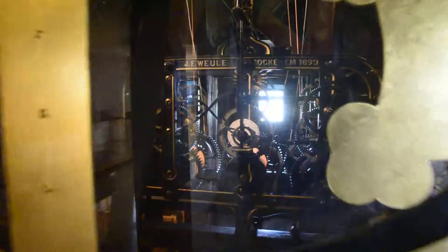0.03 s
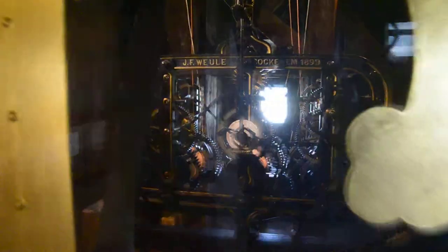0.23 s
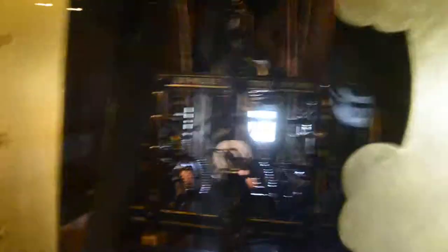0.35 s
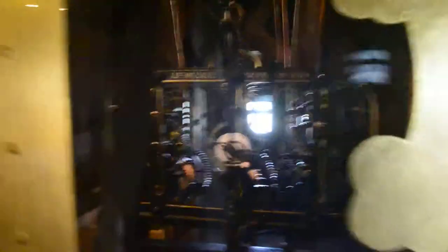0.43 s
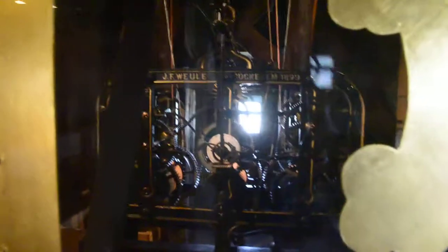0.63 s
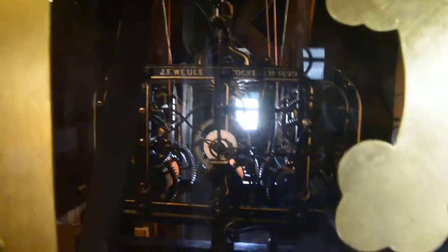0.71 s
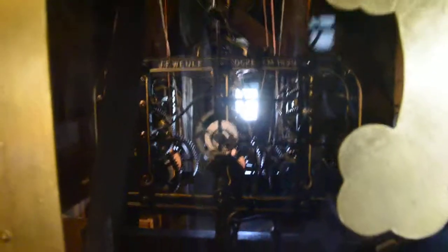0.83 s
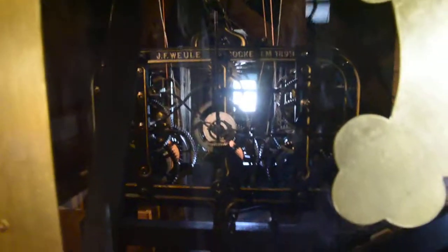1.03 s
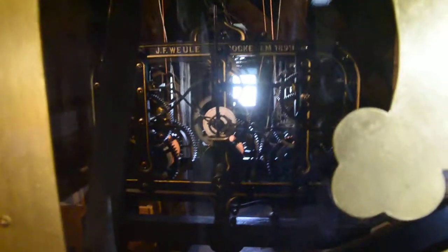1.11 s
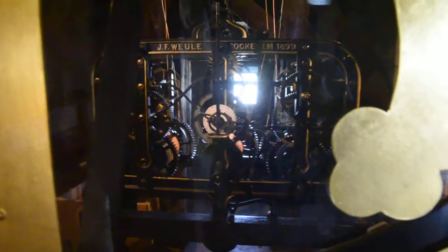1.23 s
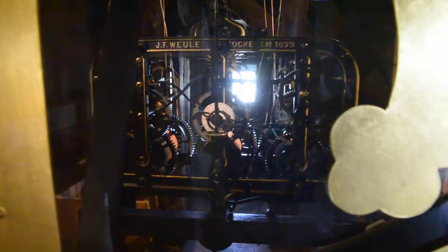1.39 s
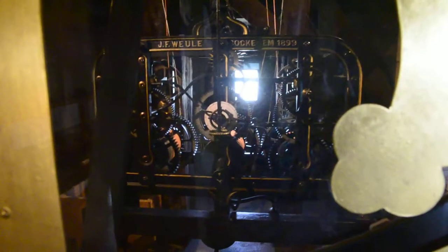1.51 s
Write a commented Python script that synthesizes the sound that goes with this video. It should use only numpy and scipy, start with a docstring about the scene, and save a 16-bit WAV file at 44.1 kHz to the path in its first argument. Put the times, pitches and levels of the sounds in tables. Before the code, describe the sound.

Two quick metallic clacks come from the works of an old clock, the first one louder. They boom and die away slowly in a big, echoing room as small parts tick lightly and irregularly.

```python
"""A tower clock in a dark chamber

The clock's works clack twice: a dull knock, a sharp metal snap a millisecond later, and a rough crack.
The large chamber answers with a long, booming tail of echoes. Small ticks of the works follow,
over a thin whine, a soft rush of air and a faint rustle that swells twice.
Ringing metal is made of fading sine waves; the echoes are fading noise and a few low tones."""
import sys
import numpy as np
from scipy import signal
from scipy.io import wavfile

SR = 44100
rng = np.random.default_rng(int(sys.argv[2]) if len(sys.argv) > 2 else 0)


def master(y):
    """Save y as 16-bit WAV."""
    cut = np.clip(np.atleast_2d(y).T, -1, 1)
    pcm = np.round(cut * 32767)  # scale
    wavfile.write(sys.argv[1], SR, pcm.astype(np.int16))


N = 68355
T = np.arange(N) / SR
CUTOFF_HZ = 16500

# The two clacks. Each row: start in seconds, knock level in dB, delay of the snap in seconds,
# snap level in dB, crack level in dB, level sent to the chamber in dB.
CLACKS = [(0.2494, 0, 0.000928, 4, 9.5, 3.5), (0.4885, -9.5, 0.001126, -8.5, -2, -5.5)]


def clacks():
    """A short push sets the works ringing; just after it, metal snaps on metal and wakes the high notes."""
    # The notes of the struck works. Each row: pitch in Hz, seconds to fade by 60 dB,
    # level in the first clack in dB, level in the second in dB.
    works_notes = [(118.5, 0.033, -0.5, -17.5), (243, 0.019, -11, -11), (465.7, 0.022, -7.5, -9.5),
                   (577.5, .028, -12, -15.5), (760, 0.026, -9, -11), (1016, 0.024, -4.5, -8.5),
                   (1101, .028, -29.5, -10), (1383, .033, -8, -25), (1425, 0.044, -28, -20.5),
                   (1640, 0.029, -9, -24), (1741, 0.018, -26.5, -19), (1969, .02, -9.5, -25.5),
                   (2178, 0.04, -20.5, -27.5), (2600, .018, -24, -26), (2833, 0.019, -24.5, -22),
                   (3103, 0.025, -12, -28), (3390, 0.013, -8, -43), (3887, 0.011, -21.5, -25),
                   (4280, 0.012, -5.5, -36.5)]
    # The notes of the snap. Each row: pitch in Hz, seconds to fade by 60 dB,
    # dB added to the snap level in the first clack, dB added in the second.
    snap_notes = [(4540, 0.0033, -7, -7), (7100, 0.0014, -4.5, -12), (10940, 0.0012, -3.5, 1),
                  (13200, .0012, -10.5, -3.5), (15170, .002, -17, -14)]
    knock_s, build_cycles = 0.00045, 1.54
    out = np.zeros(N)
    for clack, (start, knock_db, snap_delay, snap_db, _, _) in enumerate(CLACKS):
        push = np.sin(np.pi * np.minimum(since(start) / knock_s, 1)) ** 2
        out += from_db(knock_db) * push
        for k, (hz, fade_s, *levels_db) in enumerate(works_notes):
            note_start = start + snap_delay * (hz > 2500)
            build_up = 1 - np.exp(-since(note_start) * hz / build_cycles)
            direction = (-1) ** k  # neighbouring notes start by swinging opposite ways
            out += direction * from_db(levels_db[clack]) * build_up * ring(note_start, hz, fade_s)
        for k, (hz, fade_s, *levels_db) in enumerate(snap_notes):
            out += (-1) ** k * from_db(snap_db + levels_db[clack]) * ring(start + snap_delay, hz, fade_s)
    return out


def crack():
    """A short, rough burst of noise that starts with each snap."""
    # The tone of the burst. Each row: frequency in Hz, base level in dB per Hz, seconds to fade by 60 dB.
    crack_tone = [(300, -68.5, 0.09), (1200, -59, 0.072), (2340, -63.5, 0.036), (4000, -55.5, 0.024),
                  (5500, -71, 0.017), (9860, -77.5, 0.019), (15000, -90, .03)]
    out = np.zeros(N)
    for hz, noise in noise_bands():
        if hz > 250:
            db, fade_s = at_hz(crack_tone, hz)
            for start, _, snap_delay, _, crack_db, _ in CLACKS:
                snap_start = start + snap_delay
                out += from_db(db + crack_db) * (T > snap_start) * fade(since(snap_start), fade_s) * noise
    return out


def chamber():
    """Dense echoes follow each clack; the bass comes later, lasts longer and booms on a few notes."""
    # The wash of echoes. Each row: frequency in Hz, base level in dB per Hz,
    # seconds to fade by 60 dB, build-up time in seconds.
    echoes = [(25, -71.5, 1.2, .08), (45, -59, 2, .08), (83, -55.5, 1.15, 0.084), (160, -59.5, 2, 0.059),
              (230, -54, 1.58, 0.028), (339, -53, 1.25, 0.07), (480, -67.5, 1.8, .04),
              (980, -70, 1.55, .025), (1900, -78, 1.6, 0.02), (3330, -83.5, 1.4, 0.011),
              (6000, -96.5, 0.82, .02), (9860, -103, 0.63, 0.0093), (15000, -113, .55, .005)]
    # The low notes the chamber booms on. Each row: pitch in Hz, base level in dB,
    # seconds to fade by 60 dB, build-up time in seconds.
    booms = [(63.8, -47, 1.7, .08), (86.5, -30, 0.93, 0.1), (190, -38, .9, 0.15), (256.2, -39, 0.98, .03),
             (298.1, -37, 1.54, 0.062), (329.6, -36, 1.6, 0.16), (362.5, -44.5, 1.9, 0.13)]
    out = np.zeros(N)
    for hz, noise in noise_bands():
        db, fade_s, build_s = at_hz(echoes, hz)
        out += from_db(db) * echo_swell(build_s, fade_s) * noise
    for hz, db, fade_s, build_s in booms:
        out += from_db(db) * echo_swell(build_s, fade_s) * wavering_tone(hz, waver_hz=4, waver_db=2)
    return out


def echo_swell(build_s, fade_s):
    """How loud the echoes are: they build up and die away, and the two clacks add their power."""
    power = np.zeros(N)
    for start, *_, send_db in CLACKS:
        age = since(start)
        build_up = 1 - np.exp(-age / build_s)
        power += (from_db(send_db) * build_up * fade(age, fade_s)) ** 2
    return np.sqrt(power)


def ticks():
    """Parts of the works touch lightly: each touch is a tiny burst of noise and a small ring."""
    # The touches. Each row: start in seconds, level in dB, upper edge of the noise in Hz.
    touches = [(0.2707, -34.5, 12900), (0.286, -50, 13500), (.703, -28, 2850), (0.708, -52, 14000),
               (0.777, -30, 2740), (.873, -31, 1900), (0.9073, -25, 3070), (1.002, -35.5, 3600),
               (1.048, -36.5, 3600), (1.361, -32.5, 2200)]
    # The notes of every tick. Each row: pitch in Hz, seconds to fade by 60 dB, dB added to the tick's level.
    tick_notes = [(1000, 0.039, -17), (1250, 0.018, -18.5), (1439, 0.023, -21), (3050, 0.022, -22)]
    low_hz, burst_fade_s, burst_db = 850, 0.016, -3
    out = np.zeros(N)
    for start, db, top_hz in touches:
        band = signal.butter(4, [low_hz, top_hz], "band", fs=SR, output="sos")
        soften = signal.butter(1, top_hz / 2, fs=SR, output="sos")
        noise = rng.standard_normal(N) * (T > start) * fade(since(start), burst_fade_s)
        burst = signal.sosfilt(np.vstack([band, soften]), noise + 1e-18)
        ringing = sum((-1) ** k * from_db(note_db) * ring(start, hz, fade_s)
                      for k, (hz, fade_s, note_db) in enumerate(tick_notes))
        out += from_db(db) * (from_db(burst_db) * burst + ringing)
    return out


def running_works():
    """The running works whine and hiss, slowly changing in level."""
    # The tones of the whine. Each row: pitch in Hz, level at the start in dB, level at the end in dB.
    whines = [(512.3, -55, -61), (591, -65.5, -66), (1005, -72, -70), (15703, -85, -83.5)]
    # Narrow hisses. Each row: centre in Hz, width in Hz, level at the start in dB, level at the end in dB.
    hisses = [(2910, 180, -82, -67), (4398, 270, -78.5, -70.5), (7800, 270, -96.5, -94.5)]
    out = np.zeros(N)
    for hz, start_db, end_db in whines:
        out += wavering_tone(hz, waver_hz=1.0, waver_db=0.6) * from_db(np.linspace(start_db, end_db, N))
    for hz, width_hz, start_db, end_db in hisses:
        out += band_noise(hz - width_hz / 2, hz + width_hz / 2) * from_db(np.linspace(start_db, end_db, N))
    return out


def air():
    """Air in the chamber makes a soft rush; each band of it flickers a little."""
    # The tone of the rush. Each row: frequency in Hz, level in dB per Hz.
    air_tone = [(25, -100), (50, -86), (105, -78), (210, -89), (320, -86), (420, -96), (560, -84),
                (750, -90.5), (1200, -92), (2200, -97.5), (3600, -107), (5500, -117), (10000, -123),
                (16000, -125)]
    out = np.zeros(N)
    for hz, noise in noise_bands():
        db = at_hz(air_tone, hz)[0]
        flicker_db = 0.44 * drift(turns=30)
        out += from_db(db - flicker_db) * noise
    return out


def rustle():
    """A faint rustle swells just before the first clack and again at the end."""
    # How the rustle rises and falls. Each row: time in seconds, level in dB.
    loudness = [(.17, -92), (.215, -51.5), (.248, -47.5), (.28, -97), (1.47, -91), (1.52, -55.5),
                (1.55, -53.5)]
    # The bands it sounds in. Each row: centre in Hz, width in Hz, dB added to the rustle's level.
    bands = [(340, 300, 0), (805, 60, -3), (1030, 600, -3), (1894, 1800, -6.5)]
    times, levels_db = np.transpose(loudness)
    noise = sum(from_db(db) * band_noise(hz - width / 2, hz + width / 2) for hz, width, db in bands)
    return from_db(np.interp(T, times, levels_db)) * noise


def ring(start, hz, fade_s):
    """One note of a struck part: a sine wave that dies away."""
    age = since(start)
    return np.sin(2 * np.pi * hz * age) * fade(age, fade_s)


def wavering_tone(hz, waver_hz, waver_db):
    """A sine wave that wanders in pitch and level."""
    phase = 2 * np.pi * np.cumsum(hz + waver_hz * drift(turns=20)) / SR
    return np.sqrt(2) * np.sin(phase) * from_db(waver_db * drift(turns=15))


def noise_bands():
    """Noise in bands a third of an octave wide, with power one per Hz, as (centre in Hz, noise) pairs."""
    edges = 22 * 2 ** (np.arange(30) / 3)
    return [(np.sqrt(low * high), np.sqrt(high - low) * band_noise(low, high))
            for low, high in zip(edges, edges[1:])]


def band_noise(low_hz, high_hz):
    """Noise between two frequencies, with an average power of one."""
    band = signal.butter(3, [low_hz, high_hz], "band", fs=SR, output="sos")
    noise = rng.standard_normal(N + SR // 4)  # the extra quarter second lets the filter settle
    return unit_power(signal.sosfilt(band, noise)[-N:])


def drift(turns):
    """A slow random wander that takes this many steps over the scene."""
    points = rng.standard_normal(turns + 1)
    return unit_power(np.interp(np.linspace(0, turns, N), np.arange(turns + 1), points))


def at_hz(rows, hz):
    """Read a table at one frequency, blending between its rows."""
    freqs, *columns = np.transpose(rows)
    return [np.interp(np.log(hz), np.log(freqs), column) for column in columns]


def since(start):
    """Seconds gone by since a moment, zero before it."""
    return np.maximum(T - start, 0)


def fade(age, fade_s):
    """A level that falls by 60 dB every fade_s seconds."""
    return np.exp(-np.minimum(np.log(1000) * age / fade_s, 60))


def from_db(db):
    """Turn decibels into a number to multiply by."""
    return 10 ** (np.asarray(db) / 20)


def unit_power(x):
    """Scale a signal to an average power of one."""
    return x / np.sqrt(np.mean(x ** 2) + 1e-20)


def scene():
    """The works and their chamber, added into one channel."""
    return (clacks() + crack() + ticks() + chamber() + air() + running_works() + rustle())[None]


def record(dry):
    """The microphone loses the deepest bass; the loudest peaks are rounded and the top treble is cut."""
    low_hz, peak_limit = 40, 1.5
    bass_cut = signal.butter(1, low_hz, "high", fs=SR, output="sos")
    treble_cut = signal.ellip(10, 0.1, 80, CUTOFF_HZ, fs=SR, output="sos")
    heard = signal.sosfilt(bass_cut, dry)
    rounded = peak_limit * np.tanh(heard / peak_limit)
    return signal.sosfilt(treble_cut, rounded)


dry = scene()
out = record(dry)
master(out)
```